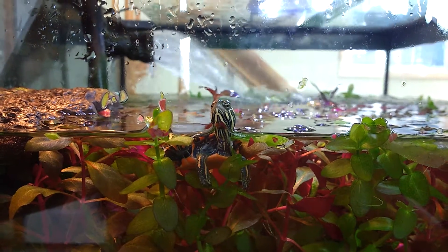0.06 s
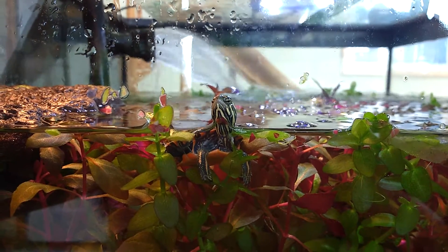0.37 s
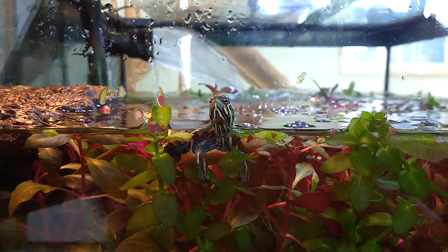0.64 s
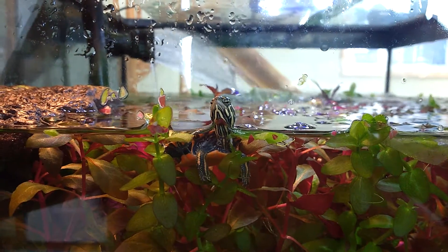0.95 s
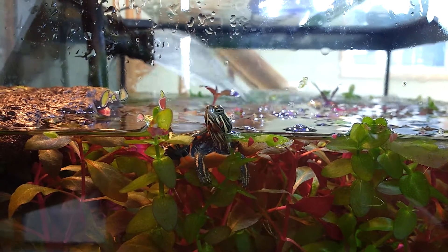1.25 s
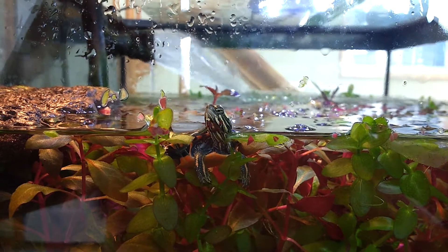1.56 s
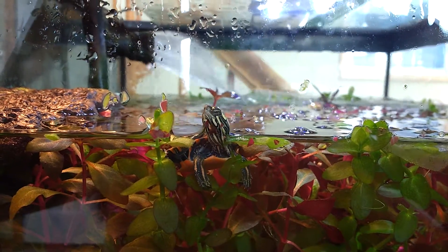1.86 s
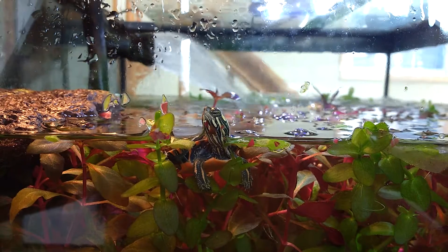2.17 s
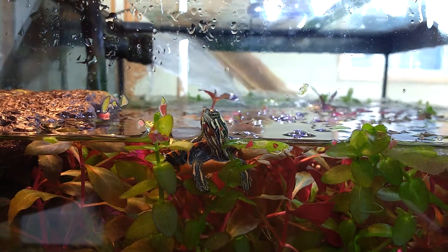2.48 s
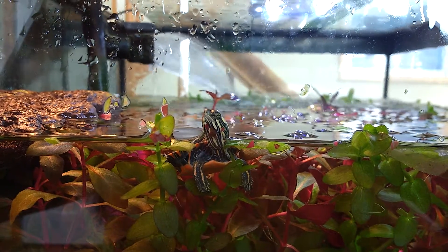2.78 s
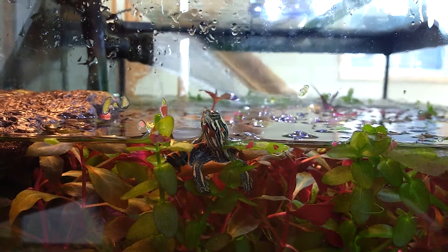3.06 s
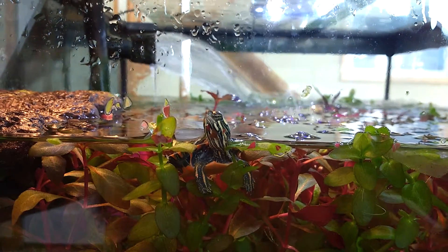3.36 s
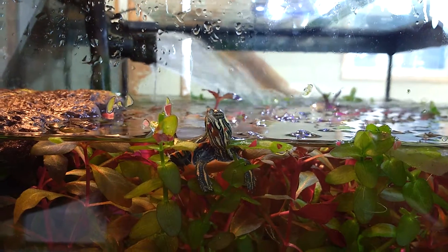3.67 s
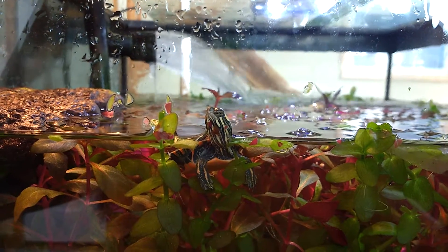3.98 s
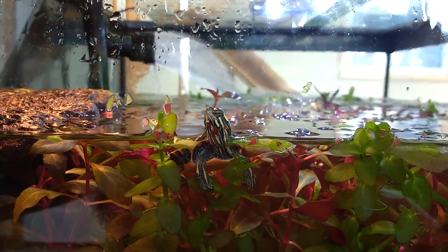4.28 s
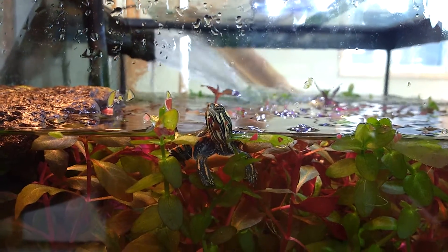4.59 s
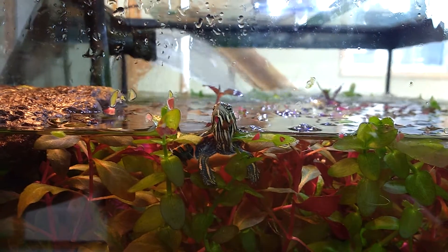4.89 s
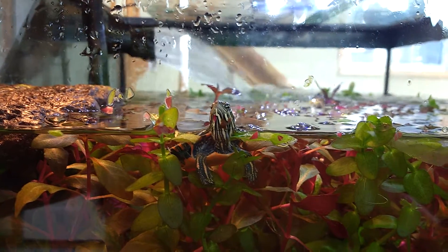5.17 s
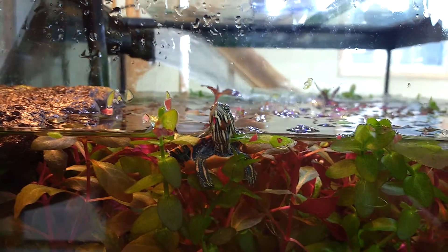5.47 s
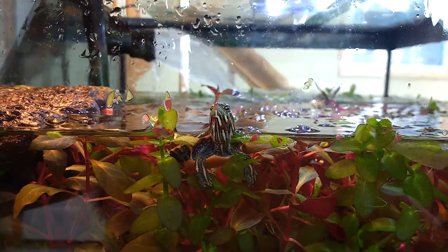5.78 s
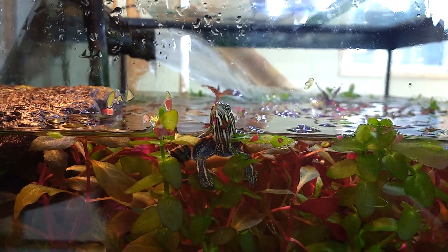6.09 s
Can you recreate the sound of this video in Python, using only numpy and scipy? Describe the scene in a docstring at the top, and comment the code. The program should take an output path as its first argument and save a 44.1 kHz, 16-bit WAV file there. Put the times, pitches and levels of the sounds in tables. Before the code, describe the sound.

Close by, a sputtering stream falls into a glass fish tank, with plopping bubbles, fizzing spray and a low hum.

```python
"""Filter outlet pouring into an aquarium

A fan of water falls into a half-filled glass tank, heard from close by. The sputtering stream
drags air under: big bubbles gulp, small ones plink and fizz, splashes and spray crackle on the
surface. The air between the glass walls rings with the bubbles, over the low hum of the pump."""
import sys
import numpy as np
from scipy import signal
from scipy.fft import rfft, irfft
from scipy.io import wavfile
from scipy.ndimage import uniform_filter1d

SR = 44100
rng = np.random.default_rng(int(sys.argv[2]) if len(sys.argv) > 2 else 0)


def bounce(signal):
    """Save signal as a 16-bit WAV file at the path given by the first command-line argument."""
    frames = np.transpose(np.atleast_2d(signal))
    limited = np.clip(frames, -1, 1)
    pcm = np.round(limited * 32767).astype(np.int16)
    wavfile.write(sys.argv[1], SR, pcm)


N = 275184
SURGES_PER_S = 9  # how fast the stream sputters


def undb(db):
    """Decibels to gain."""
    return 10 ** (np.asarray(db) / 20)


def unit(x):
    """Scale to rms 1."""
    return x / np.sqrt(np.mean(x ** 2))


def pan(db):
    """Left and right gains for a level difference."""
    return undb(np.array([[1], [-1]]) * db / 2)


def spectrum(points):
    """A curve of (f/Hz, level/dB) points on a log axis, read at every frequency bin."""
    hz, db = np.transpose(points)
    return np.interp(np.log(np.fft.rfftfreq(N, 1 / SR) + 1), np.log(hz), db)


def colour(x, eq):
    """EQ a sound and scale it to rms 1."""
    return unit(irfft(rfft(x) * undb(spectrum(eq)), N))


def add(out, s, x):
    """Mix a short sound in at time s."""
    i = int(np.clip(s * SR, 0, N - 1))
    out[i:i + len(x)] += x[:N - i]


def fade(t, t60):
    """Exponential decay, 60 dB down at t60."""
    return np.exp(-np.log(1000) * t / t60)


def wander(rate):
    """A smooth random drift at rms 1, with `rate` turns a second."""
    steps = rng.standard_normal(int(rate * N / SR) + 2)
    ramps = np.interp(np.arange(N) * rate / SR, np.arange(len(steps)), steps)
    return unit(uniform_filter1d(ramps, size=1024))


def ring(x, response):
    """Pass a mono sound through a stereo impulse response."""
    return signal.fftconvolve(x[None], response, axes=1)[:, :N]


def bubble(hz, t60, glide, rise_s):
    """A damped ring that swells as the neck closes and climbs in pitch as the bubble rises."""
    t = np.arange(int(t60 * SR) + 2) / SR
    envelope = fade(t, t60) * (1 - np.exp(-(t / rise_s) ** 2))
    return envelope / envelope.max() * np.sin(2 * np.pi * hz * t * (1 + glide * t / t60 / 2))


def swarm(per_s, low_hz, high_hz, cycles, spread_db, glide):
    """Bubbles of all sizes born at random moments, each ringing for roughly `cycles` periods."""
    out = np.zeros(N)
    for when, pitch, force, life in rng.random((int(per_s * N / SR), 4)):
        hz = low_hz * (high_hz / low_hz) ** pitch
        ping = bubble(hz, t60=cycles * (.5 + life) / hz, glide=glide, rise_s=1 / hz)
        add(out, when * N / SR, undb(spread_db * force ** 2) * ping)
    return out


def walls(x, wet_db, t60, room_db, room_t60):
    """The dry sound plus dense reflections off the glass and a longer room tail, different per side."""
    t = np.arange(SR // 3) / SR
    decay = fade(t, t60) + undb(room_db) * fade(t, room_t60)
    tail = rng.standard_normal((2, len(t))) * decay * (t > .001)
    tail /= np.sqrt(np.sum(tail ** 2, axis=1, keepdims=True))
    return x + undb(wet_db) * ring(x, tail)


# air modes between the glass walls: f/Hz, t60/s, gain/dB, left minus right/dB
TANK_MODES = [(297.7, 0.92, -0.5, 3), (382.9, 0.44, 6, 8.5), (474, 0.57, -2.5, -9), (566, 0.21, 6, -12.5),
              (719.8, 0.26, -1, -11), (852, 0.14, -4.5, 0), (911, 0.48, 2, 6), (1075.6, 0.19, 8.5, -3.5),
              (1331, 0.26, 11, -6.5), (1574, 0.27, 7, 10.5), (1697, 0.36, 7.5, 11.5),
              (1757, 0.23, 12.5, -4.5)]
def tank(x):
    """The standing waves above the water ring on after each bubble."""
    t = np.arange(SR // 2) / SR
    modes = 0
    for hz, t60, db, side_db in TANK_MODES:
        polarity = np.array([[1], [np.sign(1450 - hz)]])  # the highest modes are flipped on the right
        mode = undb(db) * fade(t, t60) / t60 * np.cos(2 * np.pi * hz * t)
        modes = modes + pan(side_db) * polarity * mode
    return ring(x, 2 * np.log(1000) / SR * modes)


# hum tones: f/Hz, level/dB, left minus right/dB
PUMP_TONES = [(121.2, -48, -12.5), (300.4, -54, -13)]
def pump():
    """The filter pump hums steadily."""
    t = np.arange(N) / SR
    return sum(pan(side_db) * undb(db) * np.sqrt(2) * np.sin(2 * np.pi * (hz * t + rng.random()))
               for hz, db, side_db in PUMP_TONES)


# rumble EQ: f/Hz, gain/dB
SLOSH_EQ = [(25, -36), (60, -15), (104, -12), (125, -5), (155, 2), (180, -14.5), (245, -6), (330, -29),
            (600, -26)]
def slosh():
    """The stirred water lays down a low, wide rumble."""
    centre, wide = rng.standard_normal(N), rng.standard_normal((2, N))
    return undb(-44) * colour(centre + 1.13 * wide, SLOSH_EQ)


# EQ of the midrange bubble bed: f/Hz, gain/dB
CHURN_EQ = [(200, -7), (330, -16.5), (450, -6), (600, -3.5), (850, 2.5), (1000, -6), (1250, 0.5),
            (1480, -12), (1800, 2.5), (2500, -116)]
def churn(ride_db):
    """Middling bubbles tumble where the stream plunges in."""
    bubbles = swarm(per_s=480, low_hz=257.7, high_hz=2044, cycles=17.8, spread_db=9, glide=.019)
    air = colour(bubbles, CHURN_EQ) * undb(ride_db)
    near = walls(air, wet_db=-1.5, t60=.08, room_db=-12, room_t60=.45)
    return undb(-1) * near + undb(6) * tank(air)


# EQ of the bright bubble bed: f/Hz, gain/dB
FIZZ_EQ = [(900, -12), (1450, -10.5), (1750, -1), (2300, 2.5), (3300, 3), (4200, -0.5), (5200, -2.5),
           (7000, 0.5)]
def fizz(ride_db):
    """Small bubbles swarm at two spots on the surface, each spot with its own reflections."""
    spots = []
    for _ in range(2):
        bubbles = swarm(per_s=520, low_hz=1280, high_hz=6900, cycles=20, spread_db=11, glide=.1)
        spots.append(colour(bubbles, FIZZ_EQ) * undb(ride_db))
    near = sum(walls(air, wet_db=9, t60=.1, room_db=-9, room_t60=.25) for air in spots)
    return undb(-13.5) * near + undb(-3) * tank(sum(spots))


# top-end EQ for sizzle and spray: f/Hz, gain/dB
MIST_EQ = [(1500, -5), (5500, 6.5), (7400, -9), (8700, 4.5), (11500, -7), (15500, -12)]
def sizzle(ride_db):
    """The tiniest bubbles burst in short, high spurts."""
    bubbles = swarm(per_s=220, low_hz=6500, high_hz=15000, cycles=22, spread_db=22, glide=.03)
    near = walls(colour(bubbles, MIST_EQ), wet_db=10, t60=.07, room_db=-14, room_t60=.25)
    return undb(-57.5 + .5 * (ride_db - ride_db.mean()) + 2 * wander(SURGES_PER_S)) * near


def spray(ride_db, drops_per_s=130, spread_db=6, tint_db=2, tick_t60=.008, tail_t60=.25, bands=6):
    """Droplets tick on the surface, each with its own colour, smeared by the glass."""
    when, chance = rng.random((int(drops_per_s * N / SR), 2)).T
    onsets = (when * N).astype(int)
    # many faint drops and few loud ones, heavier when the stream swells
    swell_db = .94 * (ride_db - ride_db.mean()) + 2 * wander(SURGES_PER_S)
    drop_db = -60.5 + spread_db * np.minimum(-np.log(chance), np.e) + swell_db[onsets]
    hiss = rfft([colour(rng.standard_normal(N), MIST_EQ) for _ in range(2)])
    hz, centres_hz = np.fft.rfftfreq(N, 1 / SR), np.linspace(1500, 15500, bands)
    out = 0
    for weights in np.eye(bands):
        band = irfft(hiss * np.interp(hz, centres_hz, weights), N)
        hits = np.bincount(onsets, undb(drop_db + tint_db * rng.standard_normal(len(onsets))) ** 2, N)
        # each hit is a sharp tick whose energy dies away between the walls
        energy = sum(signal.lfilter([gain ** 2], [1, -fade(1 / SR, t60) ** 2], hits)
                     for gain, t60 in [(undb(1), tick_t60), (1, tail_t60)])
        flutter = undb(2 * wander(rate=35))  # the mist comes in quick, uneven spurts
        out = out + flutter * np.sqrt(np.abs(energy)) * band
    return out


# bursting drops: t/s, brightest f/Hz, level/dB
SPIT_CUES = [(0.031,12500,-40), (.394,14500,-38), (0.55,6060,-34), (.706,9200,-34), (.972,11800,-37),
             (1.115,13000,-45), (1.25,7350,-32.5), (1.672,8000,-29.5), (1.794,12700,-38), (2.013,8700,-32),
             (2.352,10500,-34), (2.466,6200,-32.5), (2.745,5470,-33), (2.783,12200,-45), (2.985,12000,-38),
             (4.117,5860,-33), (4.516,7900,-36), (4.865,6000,-36.5), (5.105,5950,-33.5), (5.412,6500,-32),
             (5.647,8350,-32), (5.72,8900,-36), (6.119,8850,-33.5)]
def spits(width_hz=1100, attack_s=.0036):
    """Bigger drops burst on the surface: a short, broad crack and a narrower, lingering patter."""
    out = np.zeros((2, N))
    t, hz = np.arange(SR // 5) / SR, np.fft.rfftfreq(SR // 5, 1 / SR)
    attack = 1 - np.exp(-t / attack_s)
    for s, centre_hz, db in SPIT_CUES:
        tint = (hz > 1200) / np.sqrt(1 + ((hz - centre_hz) / width_hz) ** 2)
        for channel in out:
            noise = rfft(rng.standard_normal(len(t)))
            crack = undb(5) * fade(t, t60=.035) * unit(irfft(noise * np.sqrt(tint)))
            patter = undb(-4) * fade(t, t60=.19) * unit(irfft(noise * tint))
            add(channel, s, undb(db) * attack * (crack + patter))
    return out


# splash hits: t/s, middle f/Hz, level/dB
SPLASH_CUES = [(.798, 1800, -36), (1.6, 3270, -37.5), (2.015, 3560, -37), (2.229, 3100, -36.5),
               (2.742, 2700, -31), (3.9, 1900, -35.5), (3.956, 2300, -36), (4.933, 1240, -33.5),
               (5.201, 3630, -34), (5.548, 3200, -37.5), (6.2, 3270, -32.5)]
def splashes(bubbles=28, burst_s=.05, spread_octaves=.33):
    """A lump of water slaps down and breaks into a quick burst of bubbles of mixed sizes."""
    air = np.zeros(N)
    for s, middle_hz, db in SPLASH_CUES:
        for delay, detune in zip(rng.random(bubbles), rng.standard_normal(bubbles)):
            hz = min(middle_hz * 2 ** (spread_octaves * detune), SR / 3)
            ping = bubble(hz, t60=10 / hz, glide=.038, rise_s=1 / hz)
            add(air, s + burst_s * delay ** 2, undb(db) * ping)
    return undb(-1) * walls(air, wet_db=8, t60=.11, room_db=-15, room_t60=.3)


# small bubble accents: t/s, f/Hz, level/dB
PLINK_CUES = [(0.489,2720,-12.5), (.637,4400,-21), (1.59,2980,-14), (1.905,1170,-17.5), (2.069,3710,-16.5),
              (2.223,1216,-14.5), (2.62,1143,-18), (2.63,4140,-20), (2.636,3700,-13), (3.613,1080,-22),
              (4.125,3780,-17), (4.236,1310,-19.5), (4.652,1320,-29), (4.872,803,-16.5), (4.89,4030,-18.5)]
def plinks():
    """Single bubbles ring out above the swarm."""
    air = np.zeros(N)
    for s, hz, db in PLINK_CUES:
        add(air, s, undb(db) * bubble(hz, t60=34 / hz, glide=.063, rise_s=.0016))
    near = walls(air, wet_db=9, t60=.09, room_db=-13, room_t60=.27)
    return undb(-14.5) * near + undb(-7) * tank(air)


# pitch scoop, deeper for smaller bubbles: f/Hz, starting drop/fraction of f
PLOP_SCOOP = [(560, .03), (760, .24)]
def plop(hz, t60, rise_s=.003, scoop_s=.008):
    """A big bubble swells, slides up to its pitch and dies away."""
    t = np.arange(int(t60 * SR) + 2) / SR
    envelope = fade(t, t60) * (1 - np.exp(-(t / rise_s) ** 2))
    depth = np.interp(hz, *np.transpose(PLOP_SCOOP))
    pitch = hz * (1 - depth * np.exp(-t / scoop_s))
    return envelope / envelope.max() * np.sin(2 * np.pi * np.cumsum(pitch) / SR)


# big foreground air pockets: t/s, f/Hz, level/dB, t60/s
GULP_CUES = [(.086,604,-24.5,0.16), (.273,856,-20.5,0.062), (.375,376,-27,0.15), (.472,597,-23.5,0.055),
             (.577,580,-21.5,0.07), (.657,530,-25,0.046), (1.025,507,-24,0.032), (1.127,580,-26.5,0.038),
             (1.172,795,-27,.05), (1.203,425,-20,0.063), (1.241,750,-22.5,0.11), (1.307,539,-22.5,0.07),
             (1.366,480,-18.5,0.063), (1.485,875,-21.5,0.062), (1.527,947,-23.5,0.054),
             (1.629,558,-23,0.079), (1.747,622,-21.5,.061), (1.794,700,-22,0.04), (1.923,513,-19,0.11),
             (2.04,578,-19,0.021), (2.284,774,-18.5,0.046), (2.544,763,-24,.08), (2.61,502,-20.5,0.099),
             (2.733,836,-25,0.035), (2.979,544,-19,0.076), (3.143,610,-23.5,0.044), (3.329,518,-25.5,0.16),
             (3.375,557.5,-23.5,0.2), (3.511,380.7,-21.5,0.075), (3.574,579,-20,0.058),
             (3.787,551,-17.5,0.078), (3.88,842,-25,0.096), (4.009,567,-19,0.046), (4.13,592,-26,0.14),
             (4.254,495,-17,0.087), (4.3,433,-26,0.19), (4.396,447,-20,0.04), (4.453,498,-20.5,0.16),
             (4.631,603,-19,0.062), (4.697,594,-17.5,0.14), (4.783,584,-15,0.056), (4.973,755,-18.5,0.038),
             (5.056,662,-15,0.032), (5.139,376.6,-25,0.15), (5.631,539,-20,0.027), (5.723,547,-22.5,0.19),
             (5.811,533,-16.5,0.021), (6.192,552,-15.5,0.1)]
def gulps():
    """Air pockets pinch off with a plop, shed three bubbles and shove the water with a soft thump."""
    air, thumps = np.zeros(N), np.zeros(N)
    for s, hz, db, t60 in GULP_CUES:
        add(air, s, undb(db) * plop(hz, t60))
        for delay, detune in rng.random((3, 2)):
            shed = bubble(hz * (.806 + .5 * detune), t60=.066, glide=.042, rise_s=.001)
            add(air, s + .02 * delay, undb(db - 10.5) * shed)
        thump = bubble(rng.uniform(128.3, 156.7), t60=.12, glide=.021, rise_s=.0051)
        add(thumps, s, undb(db) * 500 / hz * thump)  # deeper gulps thump harder
    near = walls(air, wet_db=-6.5, t60=.06, room_db=-7, room_t60=.4)
    low_end = walls(thumps, wet_db=2.5, t60=.1, room_db=0, room_t60=.31)
    return undb(-3.82) * near + undb(-3) * tank(air) + undb(-18.5) * low_end


# slow drift of the stream's strength, riding the churn: t/s, level/dB
FLOW_RIDE = [(0, 1), (.8, -5), (1.3, 1), (1.9, -4.5), (2.6, -1), (3.5, -3.5), (4.1, -0.5), (4.8, -0.5),
             (5.5, -3.5), (6.24, -1.5)]
# fader ride for fizz, sizzle and spray: t/s, level/dB
TREBLE_RIDE = [(0, 2.5), (.35, -2.5), (.6, 2.5), (.85, -1), (1.2, 0.5), (1.5, 0), (2.05, 2), (2.55, -0.5),
               (2.8, 3), (3.15, -1.5), (3.8, -0.5), (4.5, 2.5), (5.05, -2.5), (5.7, 2), (5.95, 0),
               (6.24, 5.5)]
def scene():
    """The uneven stream drives bubbles and spray over the rumble and hum."""
    t = np.arange(N) / SR
    churn_db = -38 + np.interp(t, *np.transpose(FLOW_RIDE)) + 1.5 * wander(SURGES_PER_S)
    treble_db = -38 + np.interp(t, *np.transpose(TREBLE_RIDE)) + 1.64 * wander(SURGES_PER_S)
    bubbles = gulps() + plinks() + splashes() + churn(churn_db)
    surface = fizz(treble_db) + sizzle(treble_db) + spray(treble_db) + spits()
    return bubbles + surface + slosh() + pump()


# stereo balance across the spectrum: f/Hz, left minus right/dB
STEREO_BALANCE = [(100, 6), (160, 7.5), (400, 6.5), (650, 9), (950, -1), (1500, 0.5), (2100, -3.5),
                  (3200, 1.5), (4100, -3), (6500, -2.5), (8700, 1), (11000, -1), (12500, -6), (15000, -11)]
def record(dry, comb_hz=2500, low_cut_hz=46, high_cut_hz=15480):
    """Widened stereo, each side with its own colour; the treble swings in and out of phase between them."""
    hz = np.fft.rfftfreq(N, 1 / SR)
    comb_depth = np.clip(hz / 500 - 2, 0, 1) * np.exp(-(hz / 11000) ** 5)
    opposed = np.cos(np.pi * hz / comb_hz) ** 2
    likeness = np.clip(comb_depth * (.53 * (1 - opposed) - opposed ** 2.9), -.98, 1)
    left, right = rfft(dry) * hz ** 2 / (hz ** 2 + low_cut_hz ** 2)
    mid = (left + right) / 2 * np.sqrt(1 + likeness)
    side = (left - right) / 2 * np.sqrt(1 - likeness)
    pair = irfft(np.array([mid + side, mid - side]) * pan(spectrum(STEREO_BALANCE)), N)
    return signal.sosfiltfilt(signal.ellip(10, .1, 60, high_cut_hz, fs=SR, output="sos"), pair)


dry = scene()
out = record(dry)
bounce(out)
```